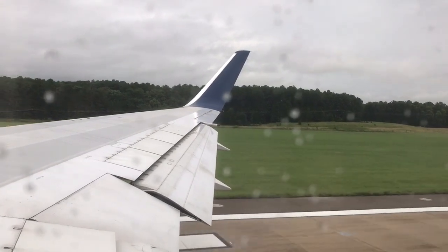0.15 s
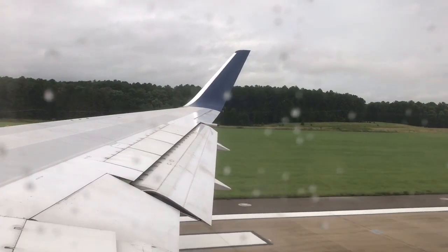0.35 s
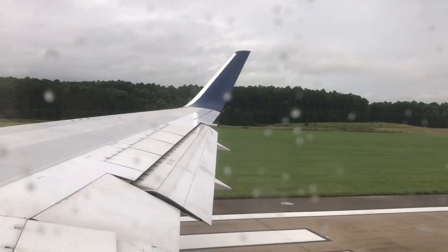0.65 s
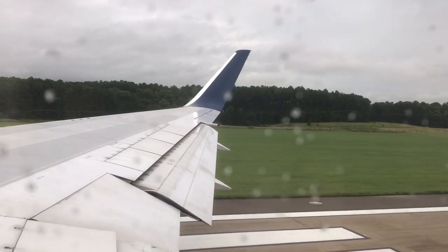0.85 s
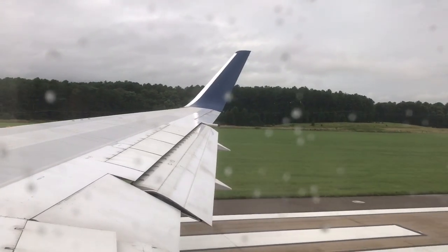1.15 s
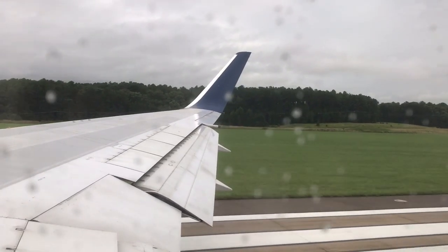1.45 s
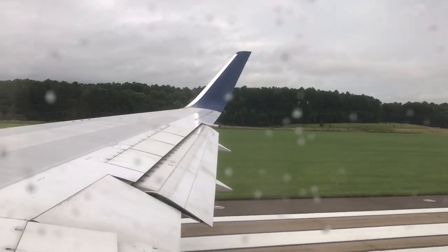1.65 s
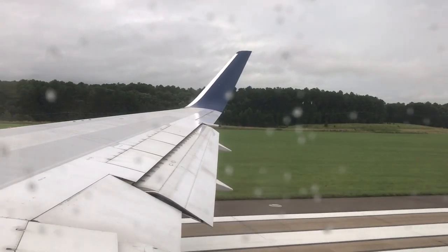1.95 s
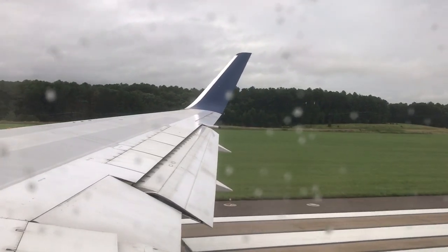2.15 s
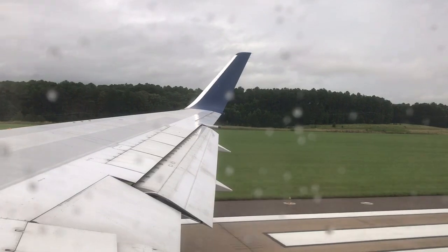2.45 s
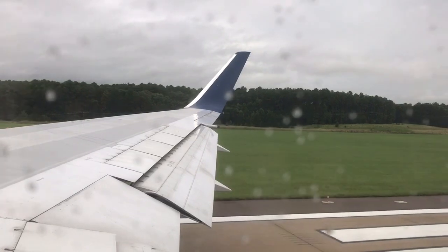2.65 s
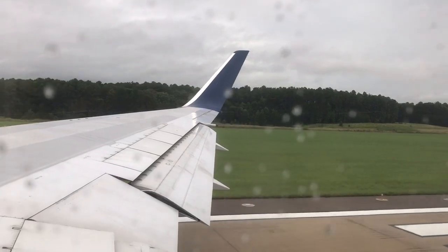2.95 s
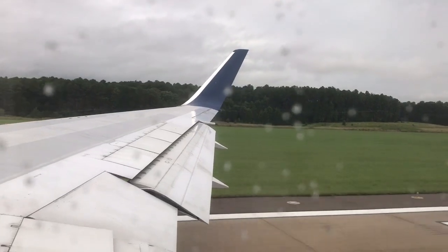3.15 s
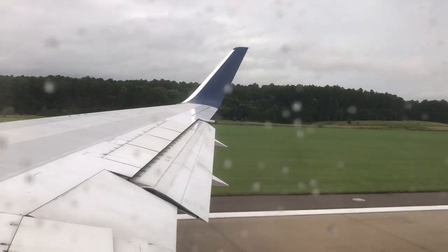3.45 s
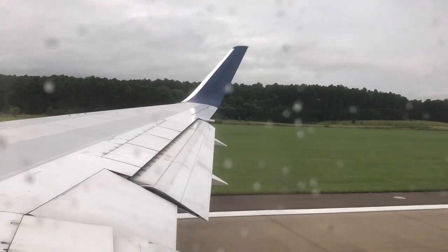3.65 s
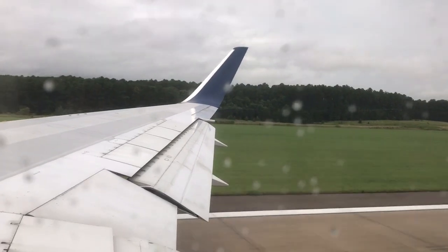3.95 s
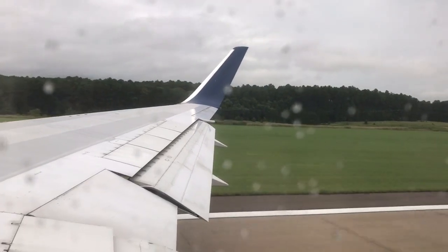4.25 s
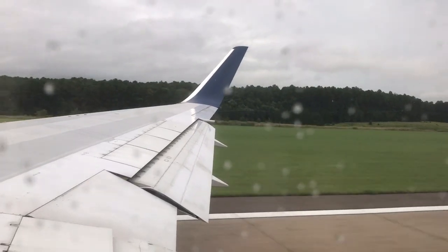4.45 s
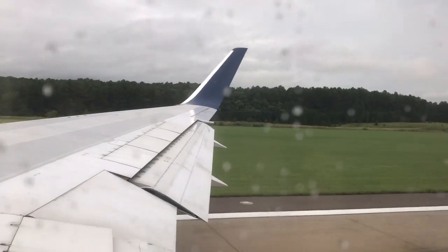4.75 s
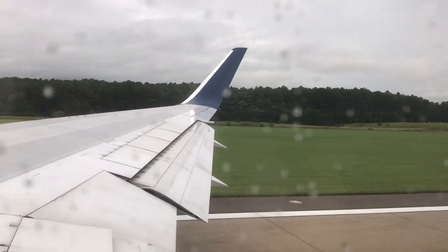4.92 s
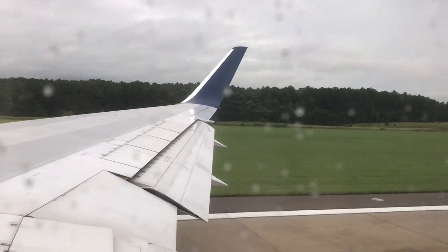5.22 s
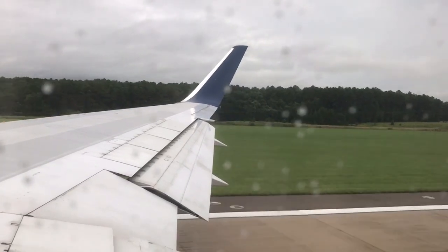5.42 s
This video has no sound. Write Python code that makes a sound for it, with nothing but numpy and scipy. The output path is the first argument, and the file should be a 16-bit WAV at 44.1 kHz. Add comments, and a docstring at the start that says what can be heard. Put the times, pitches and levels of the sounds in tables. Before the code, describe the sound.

Heavy low engine roar shakes an aircraft cabin during the takeoff roll, under a wavering high whine, thin hiss and occasional trim rattles.

```python
"""Airliner cabin at full thrust

A microphone in the cabin beside the wing, as the engines finish spooling up for the takeoff roll.
Jet exhaust shakes the hull into a deep rumble: shaped noise with an uneven level.
The fan whines at multiples of a rising blade rate, over roar and hiss that thin out as it speeds up.
Now and then the cabin trim ticks, and short bumps stand out in the mid noise: bursts in one band."""
import sys
import numpy as np
from scipy import signal
from scipy.fft import rfft, irfft
from scipy.io import wavfile
from scipy.ndimage import uniform_filter1d

SR = 44100
rng = np.random.default_rng(int(sys.argv[2]) if len(sys.argv) > 2 else 0)


def transcribe(u):
    """Save the signal u as a 16-bit wav file named by the first command-line argument.

    u: samples, shape (n,) or (channels, n), limited to [-1, 1]; the rate is SR.
    q: integer samples, one column per channel.
    """
    v = np.clip(np.atleast_2d(u).T, -1, 1)
    q = np.round(v * 32767).astype(np.int16)
    wavfile.write(sys.argv[1], SR, q)


N = 246078
T = np.arange(N) / SR


def amp(db):
    """Decibels to gain."""
    return 10 ** (np.asarray(db) / 20)


def evened(x):
    """Scales to rms 1."""
    return x / np.sqrt(np.mean(np.abs(x) ** 2) + 1e-20)


def smoothed_twice(x, span, axis=-1):
    """Two moving averages in a row."""
    return uniform_filter1d(uniform_filter1d(x, span, axis), span, axis)


def read(points, hz):
    """Reads a spectrum on a log-frequency axis."""
    f, value = np.transpose(points)
    return np.interp(np.log(hz + 1), np.log(f + 1), value)


def curve(rows, index):
    """One column of a time table at every sample."""
    rows = np.array(rows)
    return np.interp(T, rows[:, 0], rows[:, index])


# Fan speed as the rate of passing blades. Each row: time in seconds, rate in Hz.
FAN_SPEED = [(0.0, 1900.0), (0.8, 1965.0), (1.99, 2058.0), (2.39, 2086.0), (2.79, 2108.0), (3.59, 2148.0),
             (4.5, 2170.0), (5.58, 2174.0)]


def blade_rate():
    """Blades passing per second, as the fan nears full speed."""
    return curve(FAN_SPEED, index=1)


def thinning(start_db, full_db):
    """A level that moves from its start to its full-speed value in step with the fan speed."""
    hz = blade_rate()
    progress = (hz - hz[0]) / (hz[-1] - hz[0])
    return start_db + (full_db - start_db) * progress


# Hull and cabin resonances that lift or dent the noise.
# Each row: centre in Hz, width in Hz, lift in dB.
HULL_RESONANCES = [(46, 15, 1), (83.6, 16, 3), (153, 17, 1), (181.7, 18.6, 0.5), (315.1, 16.6, 4.5),
                   (419.7, 9, 5), (1050, 190, 0), (1328, 61, 9), (4870, 180, -2.5), (6000, 1000, -0.5),
                   (8500, 500, 1), (10400, 500, -3), (11500, 500, 3.5)]


def hull_noise(shape, patchy_db, flicker_db, size, bands, frames_wide):
    """Random short-time spectra with hull resonances, drifting patches and a flicker in all bands."""
    frames, hz = 4 * N // size + 5, np.fft.rfftfreq(size, 1 / SR)
    real, imag, patches = rng.standard_normal((3, len(hz), frames))
    # patches spread over neighbouring bands, then over neighbouring frames
    patches = uniform_filter1d(patches, bands, axis=0)
    patches = evened(uniform_filter1d(patches, frames_wide, axis=1))
    flicker = evened(uniform_filter1d(rng.standard_normal(frames), frames_wide))
    lift_db = sum(db / (1 + (2 * (hz - f) / width) ** 2) for f, width, db in HULL_RESONANCES)
    colour_db = (read(shape, hz) + lift_db)[:, None]
    field_db = colour_db + patchy_db * patches + flicker_db * flicker
    spectra = (real + 1j * imag) * amp(field_db)
    sound = signal.istft(spectra, nperseg=size, noverlap=3 * size // 4)[1]
    return evened(sound[:N])


def bursts(rows, rise_s, t60_s):
    """Each burst is noise in one band that rises in a few milliseconds and dies fast."""
    size = 4096
    out, t, hz = np.zeros(N + size), np.arange(size) / SR, np.fft.rfftfreq(size, 1 / SR)
    for start_s, db, centre_hz, octaves in rows:
        band = np.exp(-0.5 * (np.log2((hz + 1) / centre_hz) / octaves) ** 2)
        burst = evened(irfft(rfft(rng.standard_normal(size)) * band))
        envelope = np.minimum(t / rise_s, 1) * amp(db - 60 * t / t60_s)
        first = round(start_s * SR)
        out[first:first + size] += envelope * burst
    return out[:N]


# Bright ticks of the cabin trim.
# Each row: start in seconds, level in dB before the decay, centre in Hz, spread in octaves.
TRIM_TICKS = [(0.520, -49, 4000, .8), (1.846, -43.5, 5400, 0.97), (1.856, -46, 4500, .7),
              (2.544, -49, 3400, .45), (2.595, -44, 5800, 0.83), (2.604, -46, 5800, 0.49),
              (2.868, -48.5, 3400, .4), (3.371, -53, 6000, .4)]


def ticks():
    """Bright bursts with a wide spread of frequencies, as cabin trim ticks."""
    return bursts(TRIM_TICKS, rise_s=0.0028, t60_s=0.05)


# Short dull bumps of mid-band noise.
# Each row: start in seconds, level in dB before the decay, centre in Hz.
MID_BUMPS = [(0.444, -36, 1190), (0.461, -33, 1100), (0.514, -35, 1200), (1.016, -30.5, 980),
             (1.238, -35, 1000), (1.844, -33, 1600), (2.165, -37, 1200), (2.56, -36.5, 1200),
             (2.587, -32, 1290), (3.353, -34, 1100), (3.422, -35, 1110), (4.538, -32, 1140),
             (4.850, -36, 1210), (4.913, -32.5, 1260)]


def mid_bumps():
    """Short dull bumps of mid-band noise, in narrower bands than the ticks."""
    spread_octaves = 0.29
    rows = [(*row, spread_octaves) for row in MID_BUMPS]
    return bursts(rows, rise_s=0.0037, t60_s=0.06)


HISS_START_DB, HISS_FULL_DB = -48, -51.5

# Colour of the high hiss. Each row: frequency in Hz, relative density in dB per Hz.
HISS_COLOUR = [(850, -21.5), (1450, -2), (2110, -2), (2680, -10.5), (4280, -14), (4820, -16.5),
               (5880, -14.5), (7610, -20), (8490, -18), (10400, -24.5), (11700, -22), (15600, -27)]


def hiss():
    """High noise that thins with fan speed; its top grows brighter at first, then drops back."""
    bright_end_s, drop_s = 0.68, 0.04
    early = np.clip((bright_end_s - T) / drop_s, 0, 1)
    level_db = thinning(HISS_START_DB, HISS_FULL_DB) + 0.1 * early
    sound = hull_noise(HISS_COLOUR, 0.56, 0.48, size=512, bands=16, frames_wide=24)
    sound = amp(level_db) * sound
    # zero-phase split, so the top can be lifted and added back
    highpass = signal.butter(2, 8000, "high", fs=SR, output="sos")
    top = signal.sosfiltfilt(highpass, sound)
    top_lift_db = 0.4 + 2 * early * T / bright_end_s
    return sound + (amp(top_lift_db) - 1) * top


# Colour of the airflow roar. Each row: frequency in Hz, relative density in dB per Hz.
ROAR_COLOUR = [(260, -47), (440, -10.5), (477, -2.5), (704, -7.5), (1080, -4.5), (1180, -11), (1490, -23.5),
               (1600, -16.5), (2080, -45), (3520, -120)]


def roar():
    """Airflow noise of the middle band, thinning slightly, with a slow random drift in level."""
    wander_db, wander_s = 0.62, 0.15  # rms drift, span of each moving average
    wander = evened(smoothed_twice(rng.standard_normal(N), round(wander_s * SR)))
    level_db = thinning(-41.5, -42) + wander_db * wander
    return amp(level_db) * hull_noise(ROAR_COLOUR, 0.33, 0.78, size=1024, bands=10, frames_wide=8)


def whistle(multiple, width_hz, steady):
    """A tone on a multiple of the blade rate, part steady and part blurred by turbulence."""
    pole = np.exp(-np.pi * width_hz / SR)
    real, imag = rng.standard_normal((2, N))
    blur = signal.lfilter([1], [1, -pole], real + 1j * imag)
    blur = evened(signal.lfilter([1], [1, -pole], blur))  # second pass steepens the skirts
    turn = np.exp(2j * np.pi * multiple * np.cumsum(blade_rate()) / SR)
    return np.sqrt(2) * (turn * (np.sqrt(steady) + np.sqrt(1 - steady) * blur)).real


# The whine swells and fades.
# Each row: time in seconds, blade tone level in dB, level of its octave in dB.
WHINE_LEVELS = [(0.0, -51, -61), (0.3, -56, -66), (0.62, -63, -63.5), (0.78, -55, -74), (1.0, -49.5, -64),
                (1.12, -57, -70), (1.22, -50, -76), (1.36, -65, -69), (1.6, -54.5, -70), (1.8, -62, -71),
                (2.12, -51.5, -68), (2.26, -63, -70), (2.8, -60, -72), (3.02, -62, -67), (3.32, -64, -86),
                (3.45, -57, -82), (3.58, -67, -77), (3.77, -58, -76), (3.92, -65, -75), (4.68, -62.5, -73),
                (5.58, -64, -71)]
# Higher multiples of the blade rate, set against the level and colour of the hiss.
# Each row: multiple, relative level at the start in dB, relative level at full speed in dB.
BLADE_OVERTONES = [(3, -6, -15), (4, -9, -6), (5, -8, -10)]


def fan():
    """Blade tone and octave; higher multiples pass the same wall as the hiss and take its colour."""
    # the blade tone sounds one percent below the blade rate
    out = amp(curve(WHINE_LEVELS, index=1)) * whistle(0.99, width_hz=67, steady=0.6)
    out += amp(curve(WHINE_LEVELS, index=2)) * whistle(2, width_hz=42, steady=0.87)
    for multiple, start_db, full_db in BLADE_OVERTONES:
        wall_db = read(HISS_COLOUR, multiple * blade_rate()) + thinning(HISS_START_DB, HISS_FULL_DB)
        level_db = thinning(start_db, full_db) + wall_db
        out += amp(level_db) * whistle(multiple, width_hz=95, steady=0.03)
    return out


# Colour of the exhaust rumble. Each row: frequency in Hz, relative density in dB per Hz.
RUMBLE_COLOUR = [(21, -42), (35, -9), (80, 1), (129, -6.5), (168, -5.5), (246, -13.5), (306, -11.5),
                 (386, -26), (430, -26.5), (480, -37.5), (620, -68), (1060, -120)]
# Level of the rumble over time. Each row: time in seconds, level in dB.
RUMBLE_LEVELS = [(0.0, -16), (0.41, -14.5), (0.6, -15.5), (1.02, -15.5), (1.12, -16), (1.5, -15.5),
                 (1.84, -16.5), (1.93, -11.5), (2.05, -18.5), (2.2, -14), (2.9, -15.5), (3.65, -14),
                 (3.82, -17), (4.25, -14), (4.37, -16.5), (5.25, -15), (5.48, -16), (5.58, -19.5)]


def rumble():
    """Jet exhaust shakes the hull: deep noise with an uneven level."""
    level = amp(curve(RUMBLE_LEVELS, index=1))
    return level * hull_noise(RUMBLE_COLOUR, 0.89, 0.23, size=4096, bands=4, frames_wide=4)


def scene():
    """Everything reaches one microphone."""
    return (ticks() + mid_bumps() + hiss() + roar() + fan() + rumble())[None]


def record(dry):
    """The small microphone loses the deepest bass; then the band limit of the recorder."""
    bass_cut_hz, edge_hz = 19.7, 15750
    bass_cut = signal.butter(6, bass_cut_hz, "high", fs=SR, output="sos")
    heard = signal.sosfilt(bass_cut, dry)
    band_limit = signal.firwin(1023, edge_hz, window=("kaiser", 9), fs=SR)
    return signal.oaconvolve(heard, band_limit[None], "same")


dry = scene()
out = record(dry)
transcribe(out)
```